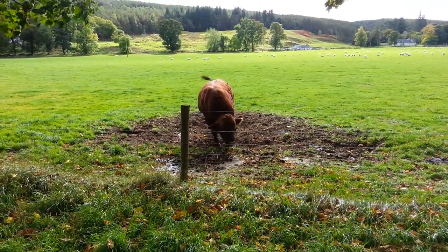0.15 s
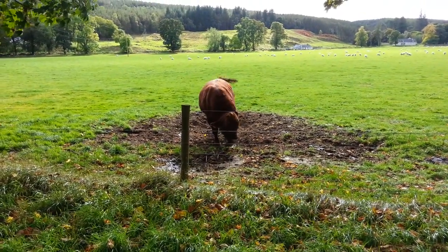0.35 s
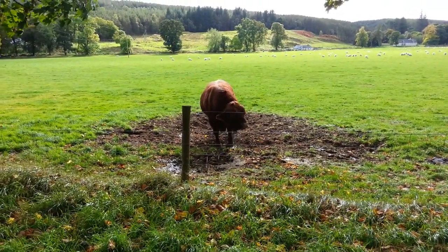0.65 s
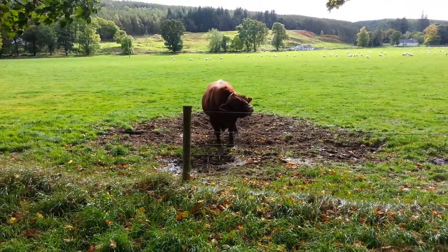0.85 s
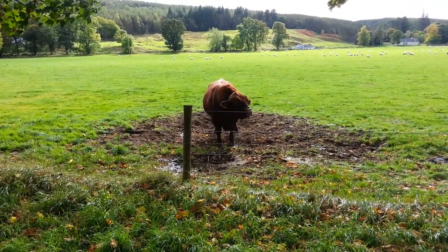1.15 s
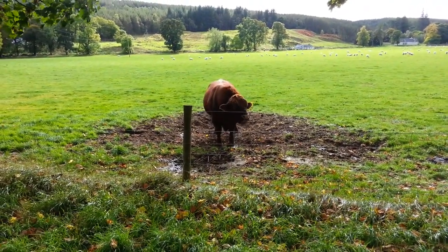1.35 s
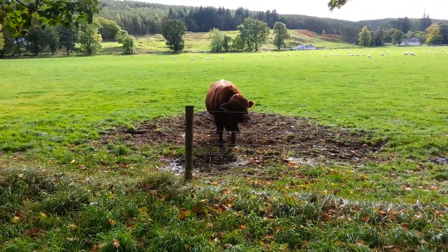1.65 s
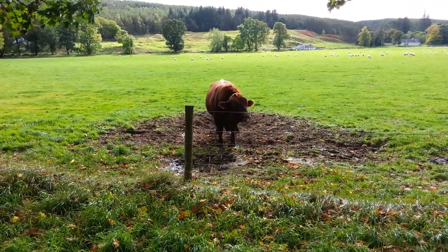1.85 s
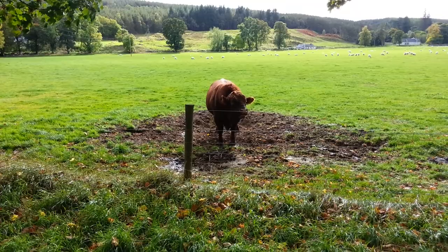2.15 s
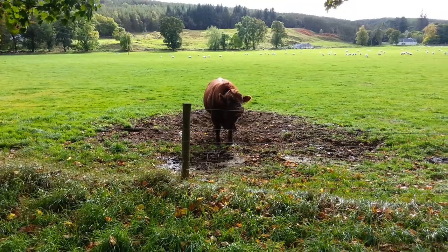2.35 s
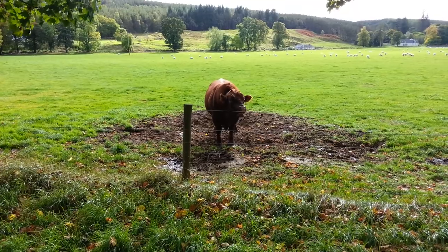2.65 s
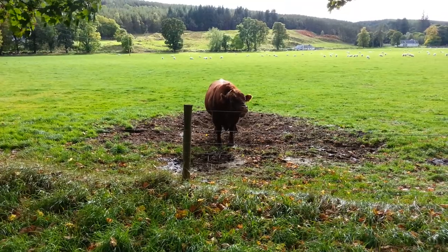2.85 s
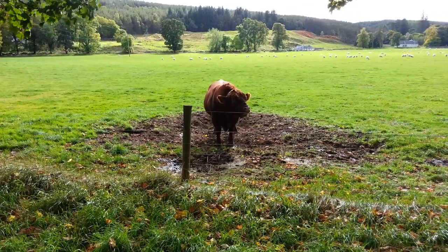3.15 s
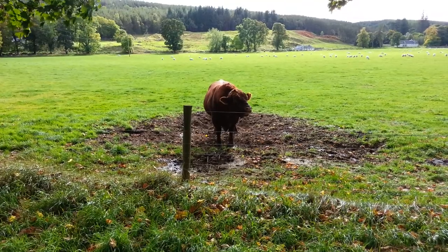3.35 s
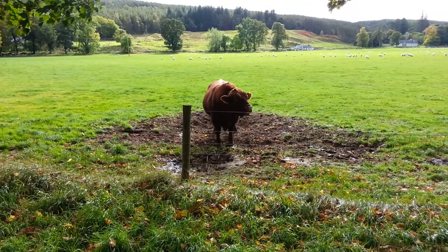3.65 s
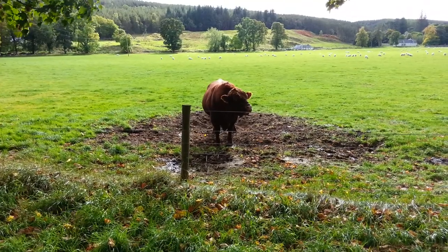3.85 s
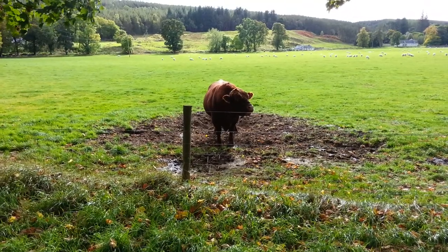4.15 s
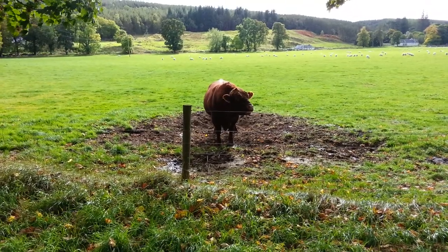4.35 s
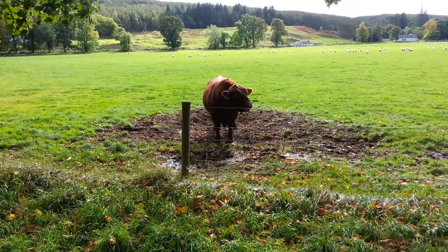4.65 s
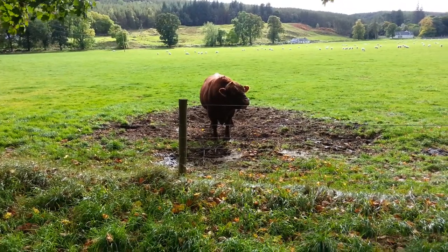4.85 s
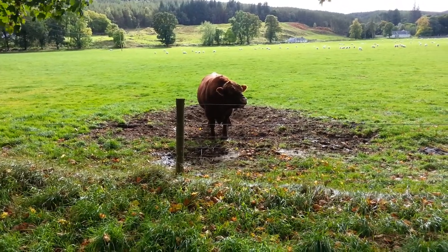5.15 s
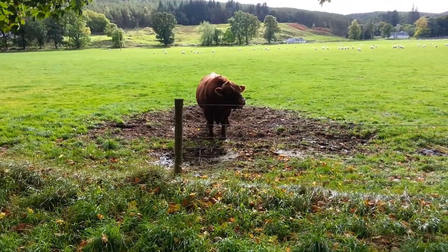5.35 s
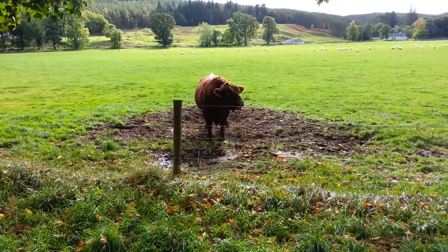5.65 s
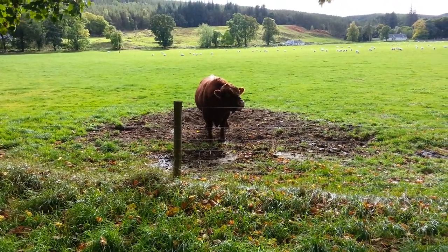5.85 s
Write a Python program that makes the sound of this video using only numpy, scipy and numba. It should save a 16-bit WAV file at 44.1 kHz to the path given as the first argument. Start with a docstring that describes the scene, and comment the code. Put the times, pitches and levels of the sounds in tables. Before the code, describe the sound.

In an open pasture, a farther cow briefly finishes a soft, clean low. Then a bull straight ahead gives two long, rough bellows about a second apart, each flicking up in pitch and closing with a short snort. Throughout, wind rumbles and thumps on the microphone, mostly on the right, over a faint, smooth hiss of distant grass and leaves.

```python
"""An open pasture, where a farther cow ends one soft clean low, then a bull gives two long rough bellows
that each close on a snort. By period doubling his vocal folds slip into a strong-weak beat, which fills
in spectral lines at half the pitch; the resonances of his long throat colour them. Turbulent wind
buffets two bare microphone ports, mostly the right one, over the far hiss of grass and leaves."""
import sys
import numpy as np
from scipy import signal
from scipy.fft import rfft, irfft
from scipy.io import wavfile
from scipy.ndimage import uniform_filter1d
from numba import njit

SR = 44100
rng = np.random.default_rng(int(sys.argv[2]) if len(sys.argv) > 2 else 0)


def generate_wav(sig):
    """Save sig (samples, or channels by samples) to the path in sys.argv[1] as 16-bit PCM at SR."""
    pcm = np.round(np.clip(np.atleast_2d(sig).T, -1, 1) * 32767).astype(np.int16)
    wavfile.write(sys.argv[1], SR, pcm)


N = 265345


def bellows():
    """Source-filter voice: the folds are roughest while the 3rd and 4th lines compete in strength."""
    pair_hz, third_db, fourth_db, seventh_db, mouth_db, along_s, tuning, sounding = bellow_contours()
    lead_db = third_db - fourth_db
    rough = .1 + .32 * np.exp(-((lead_db - 2) / 6) ** 2)
    depth = np.clip(uniform_filter1d(lead_db, size=9000) / 12 + .3, 0, 1)   # 0 light voice, 1 deep voice
    turns = np.cumsum(pair_hz) / SR + .014 * rough * drift(39)   # jitter: rough folds close early or late
    chest = chest_lines(turns, rough, depth, third_db, fourth_db, seventh_db)
    source, air = vocal_folds(turns, pair_hz, rough, lead_db)
    mouth = vocal_tract(source, air, tuning, depth, mouth_db, along_s)
    return sounding * chest, sounding * mouth


# The held part of each bellow. Each row: time in seconds, rate of strong-weak pairs in Hz,
# levels of the 3rd, 4th and 7th lines in dB, mouth level in dB.
HELD_PARTS = [
    [(1.36, 55.12, -22, -25, -58, -33), (1.5, 54.24, -23, -22.5, -60, -34.5),
     (1.7, 55.47, -23.5, -22, -63, -33), (1.83, 54.85, -19, -25, -57, -35),
     (1.95, 54.3, -18, -23, -38, -36), (2.1, 54.52, -14, -25.5, -53, -33.5),
     (2.25, 54.24, -15.5, -23.5, -59, -34), (2.4, 55.36, -14.5, -25.5, -46, -33.5),
     (2.56, 54.9, -15.5, -23.5, -42.5, -34.5), (2.69, 52.98, -17, -24, -40, -35.5),
     (2.8, 52.95, -26, -23, -57, -35)],
    [(3.89, 55.02, -26.5, -22, -67, -34), (4.0, 54.55, -26.5, -23, -63, -33),
     (4.13, 56.28, -30.5, -23, -60, -34), (4.3, 55.13, -21.5, -24, -42.5, -33.5),
     (4.55, 54.02, -19.5, -25, -61, -33), (4.72, 54.99, -18, -24.5, -50, -35.5),
     (4.88, 56.05, -16.5, -24, -37, -33), (5.0, 56.33, -15.5, -26, -31.5, -32),
     (5.15, 55.27, -17, -23.5, -36.5, -32), (5.32, 54.83, -16, -25, -35.5, -33.5),
     (5.4, 53.98, -17.5, -24, -57, -33), (5.51, 52.44, -18, -24, -57, -33)],
]
# The clean opening hum and the closing upward flick. Each row: seconds from the start (onset) or end
# (close) of the held part, pitch factor, offsets in dB of the odd lines, the even lines and the mouth.
ONSET = [(-.12, .89, -26, -17, -20), (-.09, .93, -26, -1, -17), (-.05, .99, -22, -0.5, -2),
         (0, 1, -0.5, 1.5, 0)]
CLOSE = [(0, 1, -0.5, -1, 0.5), (.018, .96, -16, 8, -1.5), (.045, 1.06, -17, -1, -2),
         (.075, 1.19, -37, -9, -12), (.1, 1.24, -29, -42, -25)]
# One row a bellow: factor on the throat resonances at the start, factor at rest, time constant in seconds.
NECK_STRETCH = [(1.065, 0.94, 1.08), (1.064, 0.97, 0.32)]

def bellow_contours():
    """Pitch and level contours; a longer tube resonates lower, so tuning sinks as the neck stretches."""
    t, contours = np.arange(N) / SR, np.ones((8, N))
    for held, (high, rest, stretch_s) in zip(HELD_PARTS, NECK_STRETCH):
        pair_hz, third_db, fourth_db, seventh_db, mouth_db = in_time(held)
        edges = [(held[0][0] + s, *offsets) for s, *offsets in ONSET]
        edges += [(held[-1][0] + s, *offsets) for s, *offsets in CLOSE]
        bend, odd_db, even_db, opening_db = in_time(edges)
        start, end = edges[0][0], edges[-1][0]
        sounding = np.clip(np.minimum(t - start, end - t) / .012 + .5, 0, 1)   # 12 ms fades
        along_s = (t - start).clip(0)
        tuning = rest + (high - rest) * np.exp(-along_s / stretch_s)
        span = (t > start - .3) | (held is HELD_PARTS[0])
        contours[:, span] = np.array([pair_hz * bend, third_db + odd_db, fourth_db + even_db,
                                      seventh_db + odd_db, mouth_db + opening_db,
                                      along_s, tuning, sounding])[:, span]
    return contours


def chest_lines(turns, rough, depth, third_db, fourth_db, seventh_db):
    """Harmonic series on the pair rate; the beat is unsteady, so the odd lines are modulated most."""
    second_db = np.maximum(third_db - 20, fourth_db - 18)
    fifth_db = third_db - 14 - 2.5 * depth
    chest = 0
    for k, level_db in enumerate([second_db, third_db, fourth_db, fifth_db, fifth_db - 12, seventh_db], 2):
        shimmer = 1 + 1.6 * rough ** 2 * (1 if k % 2 else .4) * (drift(25) + 1j * drift(25))
        lag = .35 * (k - 2) ** 2   # lines above the chest resonance lag, which rounds the beat
        line = shimmer * np.exp(1j * (2 * np.pi * k * turns - lag))
        chest = chest + np.sqrt(2) * amp(level_db) * line.imag
    return chest


def vocal_folds(turns, pair_hz, rough, lead_db):
    """Period doubling: two closures a turn, the second weaker the more the 3rd line leads the 4th."""
    beat = np.floor(2 * turns)
    weak = np.clip(1 - .5 * amp(lead_db), .15, 1)
    strength = np.where(beat % 2 == 0, 1, weak) / np.sqrt((1 + weak ** 2) / 2)
    shimmer = amp(5.7 * rough * np.clip(drift(130), -3, 1.5))
    closures = np.diff(beat, prepend=beat[0]).clip(0) * strength * shimmer * np.sqrt(SR / pair_hz / 2)
    air = (1 + .69 * np.cos(4 * np.pi * turns)) * rng.standard_normal(N)   # breath pulses with the folds
    breath_share = np.clip(.8 * rough + .1, 0, 1)
    return np.sqrt(1 - breath_share) * closures + np.sqrt(breath_share) * air, air


# Throat and mouth resonances. Each row: frequency before tuning in Hz, bandwidth in Hz,
# relative gain in dB in the light voice and in the deep voice.
FORMANTS = [(490, 29, -2, -6.5), (594, 37, -11, -6.5), (693, 24.8, 5, 2.5), (758, 86, -1, -5),
            (791, 22, 2.5, 3), (892, 51, -7, -13.5), (997.6, 33.3, 0, 2), (1222, 48, -16, -11),
            (1513, 30, -7.5, -7), (1624, 100, -8.5, -14), (1786, 36, -4, -3), (1906, 59, -8, -12),
            (2106, 63, -13.5, -10), (2554, 43, -21, -13.5), (2840, 73, -27, -19.5), (5490, 71, -41, -19.5)]

def vocal_tract(source, air, tuning, depth, mouth_db, along_s):
    """Formant filtering: a low band from the mouth, a breathier high band from the nose and lips."""
    mouth = cut(resonate(source, modes_of(FORMANTS[:8]), tuning, depth), 350, "high")
    lips = cut(resonate(source + .2 * air, modes_of(FORMANTS[8:]), tuning, depth), 1350, "high")
    lips_db = mouth_db - 11.5 + 3 * along_s.clip(0, 2)   # the lips open further along the call
    return amp(mouth_db) * rms_one(mouth) + amp(lips_db) * rms_one(lips)


# The snort closing each bellow. Each row: peak time in seconds, level in dB, hold in seconds,
# tuning factor at the peak.
SNORTS = [(2.923, -27.5, 0.046, 1.0), (5.576, -29.5, .04, 0.98)]
# Open-mouth resonances. Each row: frequency before tuning in Hz, bandwidth in Hz, relative gain in dB.
SNORT_FORMANTS = [(640, 56, 2.5), (786, 85, 2.5), (920, 46, 6), (978, 110, -2), (1150, 160, -9.5),
                  (1670, 94, -8.5), (1820, 160, -11.5), (2236, 290, -16)]

def snorts(rise_db_per_s=400, fall_db_per_s=312, sag_per_s=1.27, flutter_db=4):
    """Unvoiced excitation: fluttering air alone drives the sinking resonances of the open mouth."""
    t, envelope, tuning = np.arange(N) / SR, 0, np.ones(N)
    for s, level_db, held_s, peak_tuning in SNORTS:
        below_db = rise_db_per_s * (s - t).clip(0) + fall_db_per_s * (t - s - held_s).clip(0)
        envelope = envelope + amp(level_db - below_db)
        span = t > s - .2
        tuning[span] = peak_tuning - sag_per_s * (t[span] - s).clip(-.05, .1)
    air = resonate(rng.standard_normal(N), modes_of(SNORT_FORMANTS), tuning, np.zeros(N))
    return envelope * amp(flutter_db * drift(21)) * rms_one(cut(air, 510, "high"))


# The end of the farther cow's soft low. Each row: time in seconds, pitch in Hz, level in dB.
LOW_CONTOUR = [(0, 107.9, -30), (.1, 106.6, -37.5), (.2, 102.3, -35.5), (.26, 101.9, -43), (.31, 99, -61)]
# Its spectrum. Each row: harmonic number, offset from that level in dB.
LOW_HARMONICS = [(1, 1), (2, 4.5), (3, -34), (4, -9), (5, -15), (6, -16.5), (7, -11.5), (9, -21.5)]

def far_cow():
    """Periodic vibration: a clean harmonic series on a sinking pitch."""
    hz, level_db = in_time(LOW_CONTOUR)
    turns = np.cumsum(hz) / SR
    tone = sum(amp(db) * np.sin(2 * np.pi * k * turns) for k, db in LOW_HARMONICS)
    return np.sqrt(2) * amp(level_db) * tone * (np.arange(N) / SR < LOW_CONTOUR[-1][0])


# Steady rumble. Each row: time in seconds, left level in dB, right level in dB.
RUMBLE_LEVELS = [(0, -21, -28), (.15, -37, -23.5), (.45, -30, -22), (.75, -38, -22.5), (1.05, -38.5, -25.5),
                 (1.35, -29, -21), (1.8, -31.5, -21), (2.1, -36, -22), (2.3, -30, -24.5),
                 (2.55, -29, -24.5), (2.7, -33, -20), (2.85, -36, -24), (3.0, -34, -26.5),
                 (3.3, -35.5, -24.5), (3.75, -42, -29), (4.2, -28, -33.5), (4.5, -34, -20), (4.8, -32, -26),
                 (5.2, -39, -25.5), (5.55, -37, -27.5), (5.85, -48, -34.5), (6.01, -33, -24)]
# Strong eddies. Each row: time in seconds, level in dB (the crest stands 5.5 dB higher),
# length in ms, brightness in Hz, port (0 left, 1 right).
STRONG_EDDIES = [(.168, -18, 4.4, 457, 1), (.178, -18, 14, 219, 0), (.207, -5.5, 3.7, 147, 1),
                 (.223, -9.5, 5.5, 364, 1), (.239, -14, 4.1, 300, 1), (.352, -10.5, 9.8, 438, 1),
                 (.373, -11, 15, 380, 1), (.386, -7.5, 8.7, 200, 1), (.422, -10.5, 12.3, 374, 1),
                 (.459, -14, 12, 288, 1), (.518, -7.5, 1.6, 244, 1), (.605, -12.5, 8.8, 506, 1),
                 (.616, -9.5, 5.5, 455, 1), (.647, -18, 3.7, 322, 1), (.691, -21, 3.7, 430, 1),
                 (.749, -17.5, 11, 410, 1), (.791, -12.5, 3.7, 343, 1), (.838, -23, 7.9, 383, 1),
                 (.871, -10.5, 7.9, 333, 1), (.89, -3, 4, 615, 1), (.964, -22.5, 4.5, 343, 1),
                 (1.007, -22, 3.7, 350, 1), (1.035, -17, 2.8, 264, 1), (1.168, -14.5, 6, 420, 1),
                 (1.192, -12.5, 35, 318, 1), (1.217, -26, 5.5, 180, 0), (1.225, -21, 9, 380, 1),
                 (1.274, -12.5, 5.2, 304, 1), (1.292, -11.5, 1.6, 507, 1), (1.305, -8.5, 26, 240, 1),
                 (1.431, -13, 2, 345, 1), (1.513, -14, 17.5, 160, 1), (1.616, -9, 13, 306, 1),
                 (1.7, -11.5, 17, 400, 1), (1.887, -12.5, 7.8, 247, 1), (1.931, -3.5, 8, 310, 1),
                 (1.972, -14, 13.2, 480, 1), (2.089, -10, 9.2, 181, 1), (2.114, -15.5, 20.8, 333, 1),
                 (2.178, -12.5, 4.1, 400, 1), (2.332, -17, 8, 390, 1), (2.376, -21, 8.5, 370.2, 1),
                 (2.676, -15.5, 9.5, 280, 1), (2.787, -3, 3.64, 265, 1), (2.809, -10, 10.4, 423, 1),
                 (2.842, -13.5, 4.7, 457.5, 1), (2.861, -14, 7, 199.5, 1), (2.97, -14, 21, 263, 1),
                 (3.008, -14.5, 4.4, 390, 1), (3.068, -12, 10, 254, 0), (3.101, -12.5, 6.3, 158, 0),
                 (3.147, -16.5, 6.2, 254, 1), (3.245, -15, 5.2, 368, 1), (3.282, -13.5, 17, 424, 1),
                 (3.351, -16, 4.4, 200, 1), (3.298, -22, 4.4, 250, 1), (3.384, -11.5, 2, 550, 1),
                 (3.406, -16, 5.3, 396, 1), (3.465, -18, 9.8, 454, 1), (3.492, -11, 26, 347, 1),
                 (3.507, -15.5, 89, 596, 1), (3.538, -12.5, 3.5, 335.5, 1), (3.569, -16.5, 12.1, 269.9, 1),
                 (4.48, -26, 6.8, 329.3, 1), (4.541, -14, 12, 320, 1), (4.709, -19, 7.5, 251.4, 1),
                 (5.028, -14, 7.3, 325.7, 1), (5.073, -16, 10.1, 271, 1), (5.154, -10.5, 5.5, 489.2, 1),
                 (5.287, -18, 13.4, 298.8, 1), (5.721, -22.5, 5.35, 455.6, 1), (5.763, -18, 11.6, 220.2, 1),
                 (5.994, -17, 10, 172, 1)]

def wind():
    """Turbulent pressure at the ports: a continuous rumble, with bursts from single eddies."""
    left_db, right_db = in_time(RUMBLE_LEVELS)
    steady = np.array([rumble(left_db, lumps_db=2), rumble(right_db, lumps_db=2.5)])
    return steady + buffets(STRONG_EDDIES + small_eddies(right_db, count=130))


def rumble(level_db, lumps_db):
    """Amplitude-modulated low turbulence; the upper band swings more, so lumps are brighter than lulls."""
    swing_db = lumps_db * np.clip(drift(20), -3, 2)
    low = rms_one(cut(rng.standard_normal(N), [70, 170], "band"))
    high = rms_one(cut(cut(rng.standard_normal(N), [150, 330], "band"), 310, "low"))
    return amp(level_db) * (low * amp(.87 * swing_db) + high * amp(2 * swing_db - 9.5))


def small_eddies(rumble_db, count, mean_ms=11.7, mean_hz=320):
    """Random arrivals: rows of small eddies on the right port, whose level follows the rumble there."""
    when, size, length, brightness = rng.random((count, 4)).T
    s = .05 + (np.arange(count) + when) / count * (N / SR - .1)
    level_db = rumble_db[(s * SR).astype(int)] - .5 - 4 * size
    return list(zip(s, level_db, mean_ms * (.5 + length), mean_hz * (.5 + brightness), np.ones(count)))


def buffets(eddies, size=4096, crest_db=5.5):
    """Pressure transients: each passing eddy is a burst of low noise that rises faster than it falls."""
    ports = np.zeros((2, N + 2 * size))
    from_core_ms = 1000 * np.arange(size) / SR - 30
    for s, level_db, ms, hz, port in eddies:
        noise = rng.standard_normal(size)
        along = from_core_ms / max(ms, 2)
        envelope = np.exp(-(along * np.where(along < 0, 1.8, 1.2)) ** 2)
        push = noise * envelope
        push[np.argmax(envelope)] = .6 * np.sign(noise[0]) * np.linalg.norm(envelope)   # slap at the core
        push = cut(push, 170, "low", order=1)
        push = cut(push, 1.35 * max(hz, 60), "low", order=4)   # rolls off just above its brightness
        burst = cut(push, 105, "high")
        start = round((s - .0315) * SR)
        ports[round(port), start:start + size] += amp(level_db + crest_db) * burst / np.abs(burst).max()
    return ports[:, :N]


# Far grass and leaves. Each row: time in seconds, level in dB.
HISS_LEVELS = [(0, -37), (2.6, -37.5), (3.4, -40.5), (4.0, -40), (6.02, -39.5)]
# Their spectrum; the right port resonates in the treble.
# Each row: frequency in Hz, relative spectral density in dB on the left and on the right.
HISS_SPECTRUM = [(200, -37.5, 5.5), (490, -5.5, -24.5), (1170, -13, -14), (2020, -10, -10.5),
                 (3060, -16, -12.5), (4300, -12.5, -13), (5880, -15, -9), (7290, -19.5, 0.5),
                 (8840, -22.5, -9.5), (10230, -26, -14), (12000, -30, -18.5), (15000, -34, -36)]
# Brief flares of the hiss. Each row: start in seconds, rise in dB, decay time in seconds.
HISS_FLARES = [(.3, 4, 0.032), (4.03, 4, 0.12)]

def field_hiss():
    """Incoherent noise: far grass and leaves give a smooth hiss, uncorrelated between the ports."""
    hz, *spectra_db = np.transpose(HISS_SPECTRUM)
    log_hz = np.log(np.fft.rfftfreq(N, 1 / SR) + 1)
    gains = [amp(np.interp(log_hz, np.log(hz), db)) for db in spectra_db]
    ports = np.array([irfft(rfft(rng.standard_normal(N)) * gain, N) for gain in gains])
    t = np.arange(N) / SR
    flares_db = sum(db * (t > s) * np.exp(-(t - s).clip(0) / decay_s) for s, db, decay_s in HISS_FLARES)
    return amp(in_time(HISS_LEVELS)[0] + flares_db + .5 * drift(3.4)) * rms_one(ports)


@njit
def resonate(x, modes, tuning, depth):
    """Modal superposition: resonators of alternating sign, tuned together and weighted by voice depth."""
    out = np.zeros(len(x))
    for k in range(len(modes)):
        hz, width_hz, light, deep = modes[k]
        r = np.exp(-np.pi * width_hz / SR)
        y1 = y2 = 0.
        for i in range(2, len(x)):
            feedback = 2 * r * np.cos(2 * np.pi * hz * tuning[i] / SR) * y1 - r * r * y2
            y = (1 - r * r) / 2 * (x[i] - x[i - 2]) + feedback
            y1, y2 = y, y1
            out[i] += (-1) ** k * (light * (1 - depth[i]) + deep * depth[i]) * y
    return out


def modes_of(rows):
    """Resonance rows with linear gains for the light and the deep voice."""
    return np.array([(hz, width, amp(db[0]), amp(db[-1])) for hz, width, *db in rows])


def amp(db):
    """Decibels to amplitude ratio."""
    return 10 ** (np.asarray(db) / 20)


def rms_one(x):
    """Normalisation to rms 1."""
    return x / np.sqrt(np.mean(x ** 2) + 1e-20)


def in_time(rows):
    """Linear interpolation of table columns over time."""
    s, *columns = np.transpose(rows)
    return [np.interp(np.arange(N) / SR, s, column) for column in columns]


def cut(x, hz, kind, order=2):
    """Butterworth filter."""
    return signal.sosfilt(signal.butter(order, hz, kind, fs=SR, output="sos"), x)


def drift(rate_hz):
    """Random fluctuation: low-passed noise of rms 1."""
    return rms_one(cut(rng.standard_normal(N + 9000), rate_hz, "low")[9000:])


def scene():
    """Superposition at two ports: the bull stands ahead; wind and hiss differ in each."""
    chest, mouth = bellows()
    low_tones, mouth = chest + far_cow(), mouth + snorts()
    shaded_mouth = cut(mouth, 1510, "low", order=1)   # the right port is shaded from the treble
    cattle = np.array([low_tones + mouth, amp(3) * low_tones + shaded_mouth])
    return cattle + wind() + field_hiss()


def record(dry):
    """Band limiting and soft saturation: the bass rolls off, peaks are rounded, the top is cut."""
    rounded = .95 * np.tanh(cut(dry, 36, "high", order=4) / .95)
    return signal.sosfilt(signal.cheby2(20, 60, 14560, fs=SR, output="sos"), rounded)


dry = scene()
out = record(dry)
generate_wav(out)
```